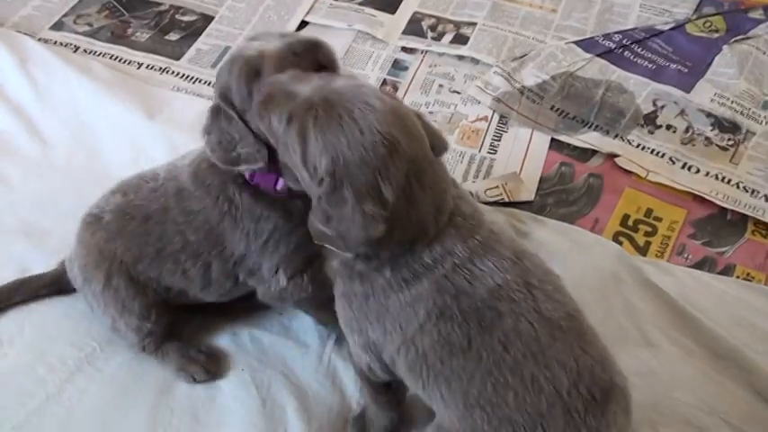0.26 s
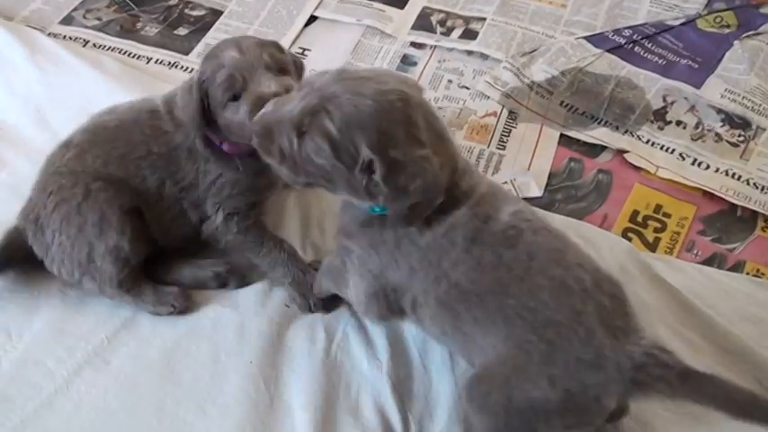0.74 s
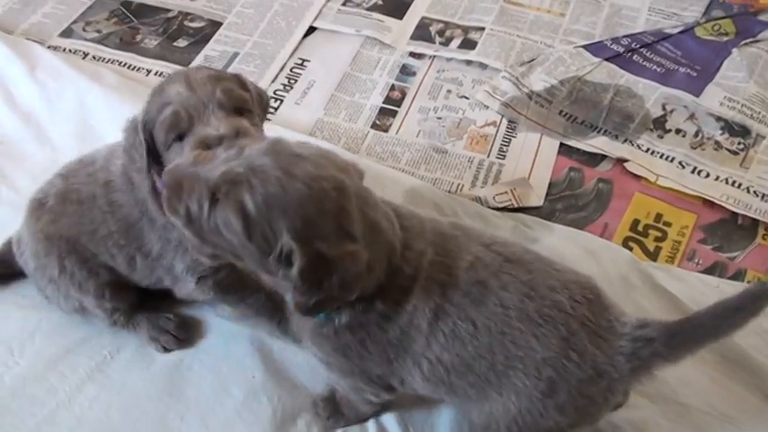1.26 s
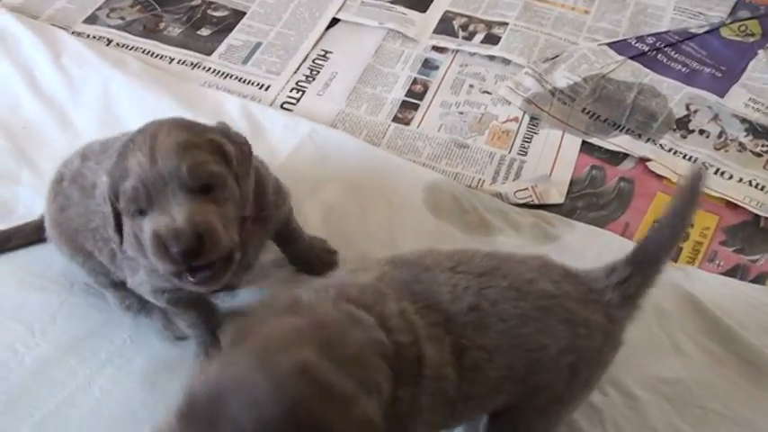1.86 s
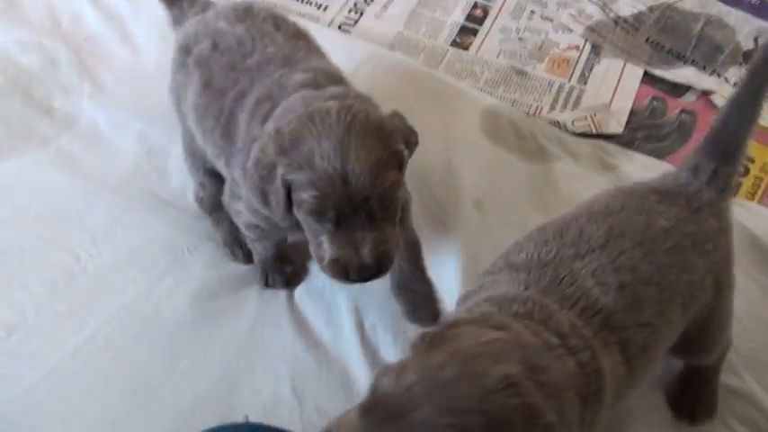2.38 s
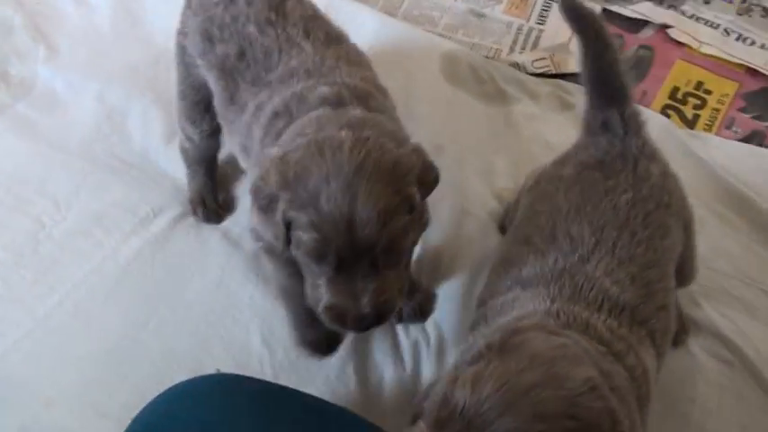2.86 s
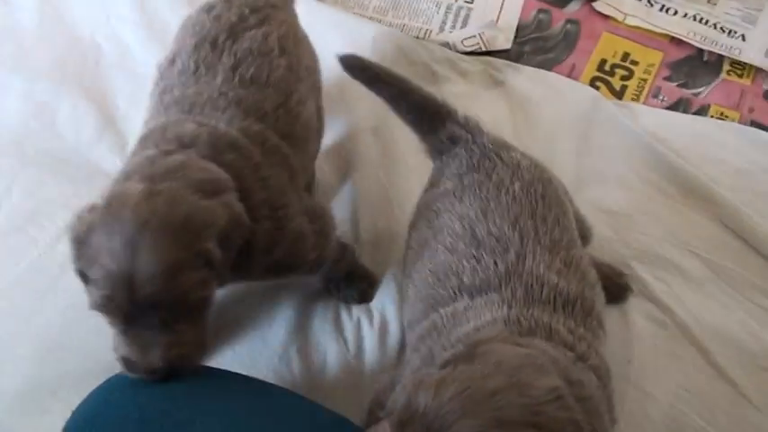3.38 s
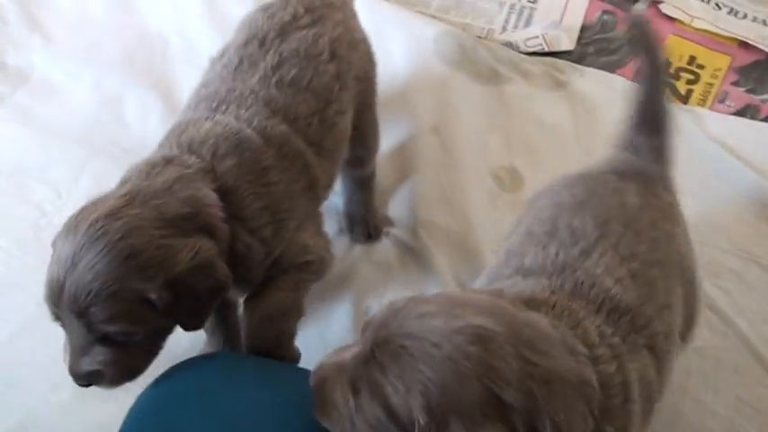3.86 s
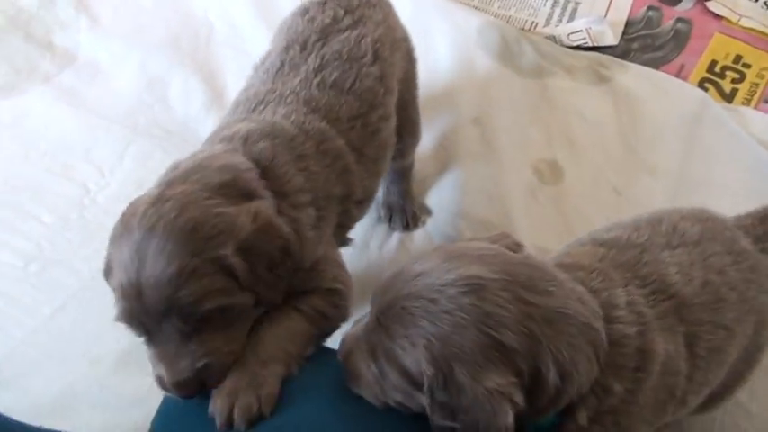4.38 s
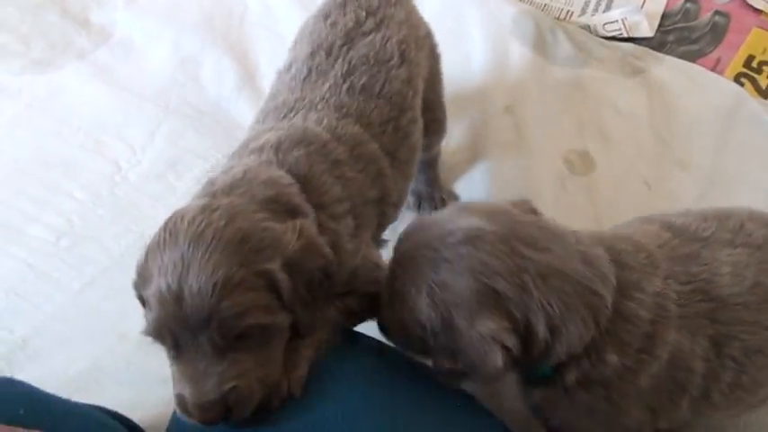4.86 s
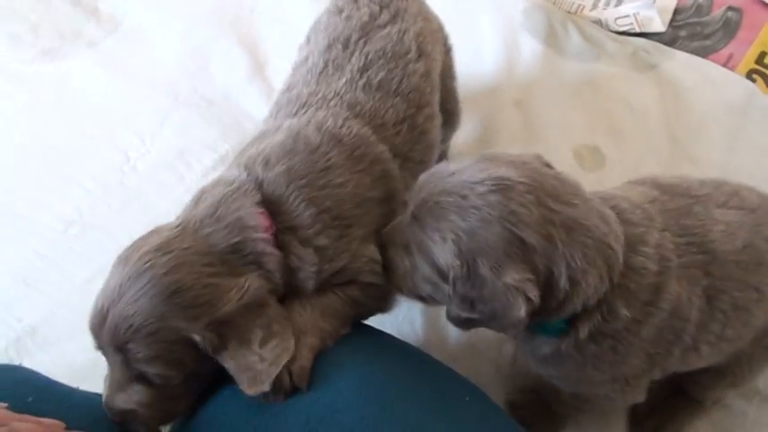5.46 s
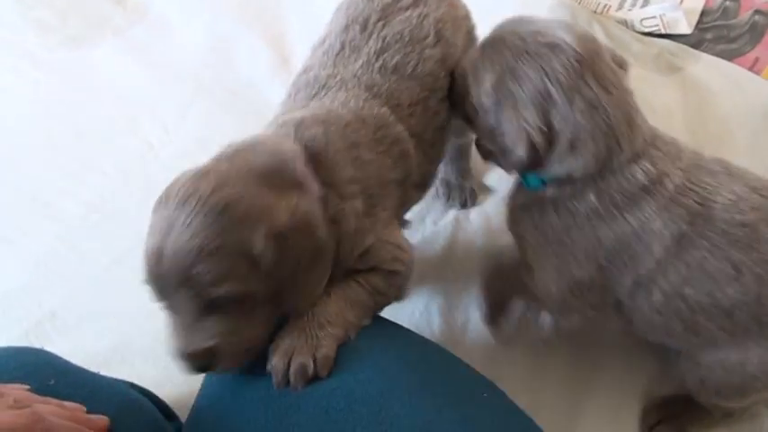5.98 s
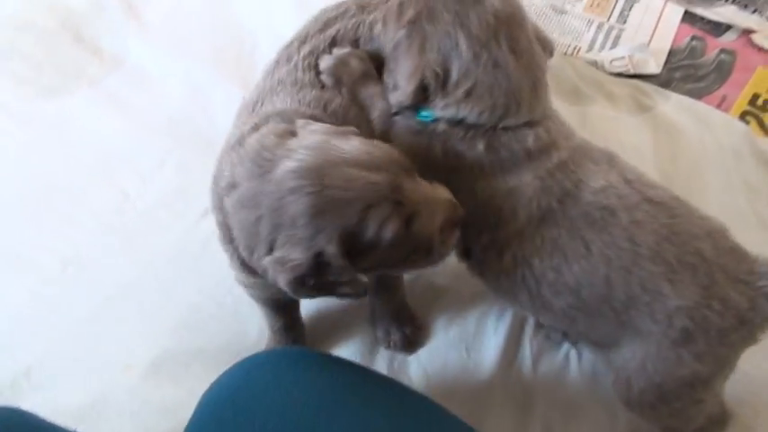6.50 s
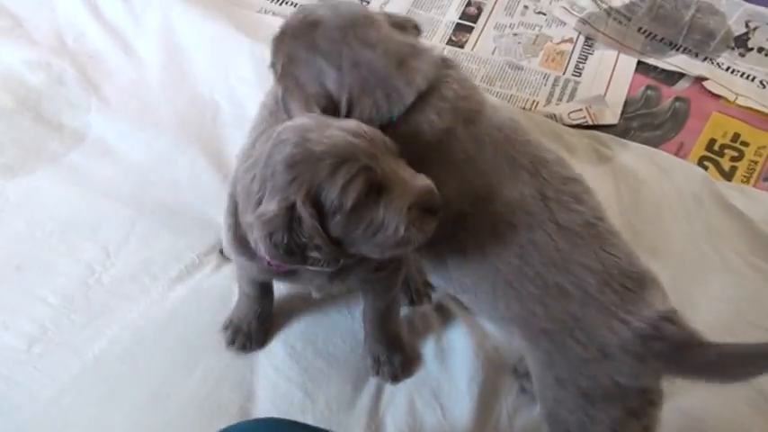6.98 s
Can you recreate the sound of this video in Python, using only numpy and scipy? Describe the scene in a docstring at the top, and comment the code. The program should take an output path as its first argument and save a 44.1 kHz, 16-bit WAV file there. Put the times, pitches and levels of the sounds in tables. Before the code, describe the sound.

A close, dry stereo scene in a small quiet room with a soft steady hush. From 0.1 to 0.6 seconds a small puppy growls, rough and rattling, rising then sinking in pitch, with buzzing throat and hissy breath. A very short growl follows at 0.6, amid loud fur rubbing, paw scuffs and sharp ticks. A second long raspy growl runs from 0.8 to 1.35, ending in a faint airy huff; a third, smoother toward its end, lasts from 1.6 to 2.2. Then things quieten: scuffs and claw ticks around 2.3 to 2.6, a tiny low grunt at 2.8, rustling cloth and scratchy zips at 2.4, 3.1 and, rising, 3.9. Sparse clicks and faint crackles continue, with a very faint grunt at 5.2 and dull soft bumps near 5.7, 6.05 and 6.8. Brighter rubbing, ticks and a scuff return around 7.0 to 7.2.

```python
"""One of two wrestling puppies gives three long rattling growls and a short one, a huff and two soft grunts:
uneven vocal-fold pulses and air puffs ring mouth and muzzle; grunts are harmonic sums, the huff is pure noise.
Fur and paws rub and scuff cloth (grain noise), claws tick (snaps) and zip over the weave (gliding noise bands),
mouths and creases crackle (decaying sines) and bodies bump on bedding (wide low resonances).
A small quiet room adds echoes, a short tail and a steady hush."""
import sys
import numpy as np
from scipy import signal
from scipy.io import wavfile
from scipy.ndimage import uniform_filter1d

SR = 44100
rng = np.random.default_rng(int(sys.argv[2]) if len(sys.argv) > 2 else 0)


def generate_wav(signal):
    """Clip the signal to [-1, 1] and save it as 16-bit WAV at the path in sys.argv[1]."""
    frames = np.transpose(np.atleast_2d(signal))
    scaled = np.clip(frames, -1, 1) * 32767
    pcm = np.round(scaled).astype(np.int16)
    wavfile.write(sys.argv[1], SR, pcm)


N = 319284
TIME_S = np.arange(N) / SR
BINS_HZ = np.fft.rfftfreq(4096, 1 / SR)

# Growl courses, one list per growl: t/s, effort/dB, pitch/Hz, roughness/1, mouth resonance/Hz
GROWL_COURSES = [
    [(0.075, -59, 149.9, .4, 1510), (0.1, -42, 160, .5, 1520), (0.17, -35, 190.8, .78, 1640),
     (0.25, -40, 184.3, 0.65, 1600), (0.33, -35, 213.2, .8, 1645), (0.41, -34.5, 225.6, 0.81, 1500),
     (0.48, -37.5, 207.8, 0.39, 1530), (0.57, -48, 173, 0.45, 1680)],
    [(0.56, -46, 174.9, .55, 1780), (0.622, -28.5, 220, .6, 2100), (0.66, -63, 210, 1.1, 2000)],
    [(0.825, -47, 184.7, .7, 1500), (0.872, -31.5, 222, 0.76, 1410), (0.99, -34, 200.2, 0.76, 1620),
     (1.05, -39.5, 199.6, 0.59, 1540), (1.11, -35.5, 213.5, 0.17, 1500), (1.16, -35.5, 205.5, 0.76, 1570),
     (1.215, -38.5, 209.2, 0.5, 1400), (1.25, -33.5, 229.8, 0.57, 1070), (1.335, -39.5, 214, 0.46, 1382),
     (1.37, -59, 205, 0.7, 1424)],
    [(1.612, -46.5, 195.5, 0.7, 1500), (1.67, -34.5, 195, .76, 1500), (1.73, -37, 189.1, .7, 1610),
     (1.81, -33.5, 216.1, .68, 1610), (1.9, -34, 208.5, 0.21, 1580), (1.97, -34, 210, 0.29, 1396),
     (2.1, -34, 208.1, 0.19, 1330), (2.19, -44, 155, 0.12, 1410), (2.25, -60, 123.6, 0, 1643)],
]
# Growl voicings, one row per growl: rattle depth/1, throat buzz/dB, rasp/dB, whistle start/dB, whistle end/dB,
# whistle start f/Hz, whistle end f/Hz; levels re effort, before the shifts below
GROWL_VOICINGS = [(.45, -7, -1.5, -23, -10.5, 9880, 9180), (.5, -11, -6.5, -27, -32, 9300, 8900),
                  (.5, -8.5, -2, -15, -32, 10900, 8100), (.65, -5, -2, -27, -17, 8600, 10100)]
# Voice colours, relative spectra: f/Hz, level/dB
CHEST_SPECTRUM = [(50, -37), (70, -19.5), (105, -17), (145, -7.5), (210, 2.5), (305, 6), (370, -7),
                  (500, -12), (900, -58), (4000, -88)]
BUZZ_SPECTRUM = [(200, -36), (330, 3.5), (430, -2.5), (570, 3), (740, -2.5), (860, -10.5), (1100, -1.5),
                 (2000, -33), (8000, -82)]
RASP_SPECTRUM = [(400, -39), (850, -9), (1100, 2), (1500, -3), (2050, 2), (2400, -5), (2800, -19),
                 (5000, -39), (12000, -72)]
HISS_SPECTRUM = [(1500, -35), (2600, -0.5), (3400, -1.5), (5000, 1.5), (7000, -0.5), (9000, 1.5),
                 (11000, 0.5), (16000, -11.5)]
# Upper muzzle resonances, moved by jaw and lips: centre f/Hz, width of each of two stages/Hz, level/dB
MUZZLE_RESONANCES = [(3490, 1400, 6), (4340, 1240, -0.5), (5500, 1040, 5.5), (6290, 670, 0.5),
                     (8060, 580, -2)]
# Closed-mouth grunts, one list each: t/s, level/dB, pitch/Hz
GRUNTS = [
    [(2.777, -70, 172), (2.792, -41.5, 153.5), (2.812, -51, 126), (2.835, -53, 106.6), (2.88, -53, 98),
     (2.915, -66, 88)],
    [(5.175, -69, 183.6), (5.205, -48.5, 166.6), (5.24, -57, 157.5), (5.29, -60, 156)],
]
# Nose transmission of the grunts: f/Hz, level/dB
NOSE_SPECTRUM = [(60, -16), (100, -4), (150, -6), (230, 2), (310, -0.5), (420, -19), (600, -13), (900, -40),
                 (1250, -9), (2000, -40)]
# Voiceless huff from the end of the second long growl: t/s, level/dB
HUFF_COURSE = [(1.34, -62), (1.38, -49), (1.45, -54), (1.52, -59), (1.58, -74)]
# Fur and paws sliding on cloth: t/s, length/s, rub level/dB, muffled drag level/dB before DRAG_TRIM_DB
SLIDES = [(-0.03, 0.027, -51, -51.5), (0.479, 0.14, -40.5, -47.5), (0.568, 0.076, -38, -49),
          (0.684, 0.15, -42, -44.5), (1.377, 0.13, -55.5, -61.5), (2.189, 0.14, -49.5, -53.5),
          (2.515, 0.18, -50, -52), (2.756, 0.04, -54, -55.5), (2.946, 0.083, -51.5, -56.5),
          (3.129, 0.25, -51, -53), (3.446, 0.078, -59, -59.5), (3.566, 0.14, -55.5, -59),
          (3.847, 0.04, -57, -65), (3.943, 0.24, -57, -58), (4.93, 0.045, -54.5, -54.5),
          (5.2, 0.11, -59.5, -58), (5.392, 0.074, -56.5, -62), (5.532, 0.058, -64, -64),
          (5.692, 0.1, -65.5, -64.5), (5.904, 0.12, -58.5, -56), (6.38, 0.076, -57.5, -58),
          (6.542, 0.1, -55.5, -56.5), (6.752, 0.29, -62.5, -59), (6.948, 0.26, -51.5, -56),
          (7.108, 0.084, -45.5, -48)]
# Colours of rub and drag: f/Hz, level/dB
CLOTH_SPECTRUM = [(500, -13.5), (1200, 6), (1700, 3), (2400, 4), (4300, -3.5), (6200, -0.5), (7600, -6),
                  (10000, -10), (13000, -12.5), (16000, -28.5)]
DRAG_SPECTRUM = [(80, -36.5), (200, -6), (330, 3.5), (450, 0.5), (620, 3), (850, -2.5), (1150, 0),
                 (1500, -6.5), (2500, -19.5)]
# Paw strokes: t/s, length/s, level/dB before SCUFF_TRIM_DB, ring f/Hz, bass/dB, treble/dB
SCUFFS = [(0.146, 0.0059, -29, 2230, -8, -1), (0.502, 0.038, -36, 5060, 4, 3.5),
          (0.596, 0.048, -31.5, 3130, -10.5, -10), (1.299, 0.0097, -29, 435, 3, 0),
          (2.302, 0.021, -35, 5650, 1, -4.5), (2.367, 0.018, -39, 4040, -12, -8),
          (2.495, 0.011, -40.5, 614, 9.5, -5), (2.556, 0.028, -35.5, 1920, -1.5, -2.5),
          (2.965, 0.027, -45, 3580, 2, -5), (3.21, 0.025, -40.5, 2430, -4, -5.5),
          (3.326, 0.014, -35, 1140, 3, -4), (3.988, 0.046, -49, 1320, 0, -6.5),
          (4.548, 0.017, -47.5, 1100, 5.5, -9), (4.688, 0.012, -45, 1020, 3.5, 0.5),
          (4.892, 0.004, -48, 2770, 19, 16), (5.197, 0.034, -45, 570, 4.5, -9),
          (5.42, 0.042, -47.5, 1330, 2.5, -4), (5.956, 0.019, -35.5, 2290, -2.5, -1.5),
          (6.283, 0.011, -47.5, 6360, -7, 3), (6.445, 0.039, -48, 2400, 2, -4),
          (7.159, 0.028, -40.5, 1217, 2.5, 1)]
# Claw ticks, mouth smacks and sheet snaps: t/s, energy/dB, ring f/Hz, bass/dB, treble/dB
TICKS = [(0.485, -13.5, 1790, -4, -3), (0.5174, -9, 5540, 7, 3), (0.5384, -7, 2340, -21, 1),
         (0.616, -7, 2270, -16, -22), (0.6325, -2, 2710, -21, -20), (0.7093, -9, 5440, -2, 13),
         (0.7968, -14.5, 1630, 1, 2), (1.138, -21, 4860, -12, 6), (1.2983, -6.5, 1970, -4, -10),
         (1.4744, -20.5, 3720, -2, -3), (2.2396, -17.5, 6460, -27, -9), (2.306, -12.5, 6100, -9, 0),
         (2.3232, -8, 5460, -14, 11), (2.659, -15, 1480, 3, -2), (2.7021, -16, 1165, 3, 2),
         (2.7365, -12, 2300, -4, 7.5), (2.7839, -17.5, 1420, 6, -11), (3.036, -17.5, 3060, -1, -3),
         (3.355, -15.5, 1190, 1, -1), (3.3702, -18.5, 2300, -6, -4), (3.4352, -21.5, 6040, -6, 10),
         (3.4703, -16, 2050, -1.5, 0), (3.617, -17, 6470, -15, -2), (3.6969, -19.5, 3240, 6, -10),
         (4.1403, -18.5, 7200, -12, 8), (4.4874, -31, 2390, -12, -25), (4.6376, -26, 1270, 16, -19),
         (4.8927, -16, 2900, 3, 3.5), (4.93, -25.5, 5370, -4, -13), (4.989, -16, 2390, -3.5, -8),
         (5.1355, -26.5, 3280, -29, -27), (5.1892, -25.5, 2550, -8, -22), (5.4213, -17, 6370, 0, -4.5),
         (5.5104, -23, 1170, -2, -14), (5.57, -19.5, 2400, -16, -9), (5.6009, -20, 2450, -4.5, -1.5),
         (5.7215, -23.5, 1540, -1, -17), (5.9399, -27, 1440, 0, -6), (5.961, -14, 3500, -16, -15),
         (6.0436, -18, 6150, -1, -4), (6.1844, -24, 5950, -14, -8), (6.2876, -19, 6300, 5, -13),
         (6.3808, -17, 970, -5, 1.5), (6.4045, -20, 1060, -1, -4), (6.6094, -21.5, 4770, -1, -5),
         (6.724, -19, 2700, -4.5, -10), (6.7624, -18, 3660, -1.5, -1), (6.932, -15, 1150, -3, -11),
         (7.0062, -23, 6500, 9, 14), (7.0829, -10.5, 3020, -10.5, -6), (7.1607, -10, 1380, 6, -14),
         (7.212, -16.5, 3560, -4, 0)]
# Claw zips over the weave, one list each: t/s, level/dB, thread rate f/Hz
ZIPS = [
    [(2.37, -56, 2220), (2.379, -40, 2400), (2.388, -52, 2520), (2.396, -62, 2500)],
    [(3.12, -47, 2090), (3.137, -44.5, 2200), (3.155, -51, 2270), (3.175, -44, 2310)],
    [(3.85, -64, 1500), (3.868, -46, 2200), (3.878, -41, 2720), (3.885, -38, 3320), (3.897, -42, 3730),
     (3.91, -58, 3900)],
]
# Body bumps on the bedding: t/s at half height, length at half height/s, level/dB, f/Hz
BUMPS = [(4.352, 0.12, -65, 39.2), (4.356, .04, -62.5, 170), (4.64, 0.099, -65, 45),
         (4.66, 0.039, -66, 122), (4.928, 0.073, -63, 44.5), (5.683, 0.043, -52.5, 314),
         (5.685, 0.13, -55, 33.7), (5.769, 0.047, -61, 201), (6.039, 0.044, -49.5, 270),
         (6.061, 0.053, -57.5, 102), (6.817, 0.042, -50.5, 274)]
# Room decay: f/Hz, t60/s
ROOM_DECAY = [(150, 0.28), (500, 0.31), (2000, 0.29), (6000, 0.4), (14000, 0.15)]
# Floor and wall echoes: delay/s, gain re direct sound/1
ECHOES = [(.0031, -0.18), (.0068, 0.012), (0.0116, 0.21), (0.0142, 0.19)]
# Stereo balance: t/s, left minus right/dB
PAN_COURSE = [(0.0, 0.0), (2.08, 0.5), (2.5, -0.5), (3.3, -.1), (3.8, -1.6), (7.24, -0.5)]
# Still room air, relative spectrum: f/Hz, level/dB
AIR_SPECTRUM = [(15, -30), (25, -6), (64, 0.5), (141, -6.5), (476, -2.5), (677, -10), (1260, -5),
                (1940, -10), (2350, -9), (4370, -15), (6210, -15), (14800, -26.5), (16000, -25)]

# Growl levels re effort, at roughness 0.5; hiss also at its usual effort
CHEST_DB, HISS_DB = -1, -7
# Shift per unit roughness: power moves up out of the chest
CHEST_ROUGH_DB, RASP_ROUGH_DB, HISS_ROUGH_DB = -3.5, 12, 5.5
# Turbulence gains on the tone: extra dB per dB of effort
HISS_GROWTH, USUAL_EFFORT_DB = 0.17, -36.5
# Buzz gains as the mouth closes and its resonance sinks
BUZZ_DB_PER_OCTAVE, USUAL_MOUTH_HZ = -10, 1500
# Tooth whistle rises (exponent) and swells with pitch
WHISTLE_BEND, WHISTLE_DB_PER_OCTAVE, USUAL_PITCH_HZ = 0.073, 30, 210
# Loose tissue starts to rattle above this effort, fully after the range
RATTLE_FROM_DB, RATTLE_RANGE_DB = -49.5, 13
SLIDE_RISE_S, SLIDE_FALL_S = 0.021, 0.087
# Constant fur stirring, drag before its trim
FUR_DB, FUR_DRAG_DB = -74.5, -67.5
DRAG_TRIM_DB, SCUFF_TRIM_DB = 0.5, -0.5
AIR_DB = -62.5  # part common to both channels
EDGE_HZ = 16000


def amp(db):
    """Decibels to gain."""
    return 10 ** (np.asarray(db) / 20)


def unit(x):
    """Scales to rms 1."""
    return x / np.sqrt(np.mean(x ** 2) + 1e-20)


def steady(x, size=2200):
    """Holds short-term rms at 1 over size samples, so a level curve can take over."""
    return x / np.sqrt(abs(uniform_filter1d(x ** 2, size)) + 1e-12)


def read(points, hz=BINS_HZ):
    """Interpolates a spectrum table on a log-frequency axis."""
    f, value = np.transpose(points)
    return np.interp(np.log(hz + 1), np.log(f + 1), value)


def follow(rows, t):
    """Interpolates each column of a curve table at times t."""
    s, *columns = np.transpose(rows)
    return [np.interp(t, s, column) for column in columns]


def add(mix, start_s, sound):
    """Mixes a sound in at start_s."""
    part = mix[max(round(start_s * SR), 0):][:len(sound)]
    part += sound[:len(part)]


def impulse(db):
    """Minimum-phase impulse response of a spectrum, energy 1."""
    log_gain = np.log(amp(np.maximum(db, -100)))
    both_sides = np.r_[log_gain, log_gain[-2:0:-1]]
    response = np.fft.ifft(np.exp(np.conj(signal.hilbert(both_sides)))).real[:2048]
    return response / np.linalg.norm(response)


def colour(x, db):
    """Filters x by a spectrum."""
    return signal.fftconvolve(x, impulse(db))[:len(x)]


def resonate(x, hz, width_hz):
    """Resonance of peak gain 1 following hz: shift to zero, one-pole low-pass, shift back."""
    turn = np.exp(2j * np.pi * np.cumsum(hz * np.ones(len(x))) / SR)
    pole = np.exp(-np.pi * width_hz / SR)
    return 2 * (turn * signal.lfilter([1 - pole], [1, -pole], x / turn + 1e-18)).real


def ring(x, hz, width_hz):
    """Two resonances in series: steep flanks, dark valleys."""
    return resonate(resonate(x, hz, width_hz), hz, width_hz)


def wander(count, size):
    """Smoothed noise of rms 1."""
    noise = rng.standard_normal(count)
    return unit(uniform_filter1d(uniform_filter1d(noise, size), size))


def random_clicks(count, per_s, spread_db, limit):
    """Sparse clicks of unequal size, as a gain per sample."""
    size = amp(spread_db * np.minimum(rng.exponential(1, count), limit))
    return size * (rng.random(count) < per_s / SR)


def grains(count, per_s, spread_db, smooth):
    """Fibres catching and letting go: clicks over a smooth hiss."""
    clicks = random_clicks(count, per_s, spread_db, limit=4) * rng.standard_normal(count)
    return unit(unit(clicks) + smooth * rng.standard_normal(count))


def larynx(t, hz, rough, rattle, jitter=0.17, shimmer=0.51, slip=0.6, snap=0.5,
           puff_cycles=0.82, leak=0.12, chest_share=0.6):
    """Uneven fold pulses; slower tissue weakens about two in three, which the chest feels less."""
    speed = np.maximum(1 + jitter * rough * wander(len(t), size=200), 0.3)
    turns = np.cumsum(hz * speed) / SR
    cycle = turns.astype(int)
    stray, push = np.clip(rng.standard_normal((cycle[-1] + 1, 2)), -2, 2)[cycle].T
    closure = np.diff(cycle, prepend=0)
    # Tissue turns a third per closure, erratically when rough
    slow_turns = np.cumsum(closure * (1 + slip * rough ** 2 * stray)) / 3 + 1 / 6
    weak = slow_turns % 1 > 1 / 3
    size = (1 - np.clip(rattle, 0, 0.95) * weak) * np.exp(shimmer * rough * push)
    noise = rng.standard_normal(len(t))
    puffs = (leak + size ** snap * np.exp(-(turns % 1) / puff_cycles)) * noise
    return unit(closure * size), unit(closure * size ** chest_share), unit(puffs), noise


def growl(rows, voicing, hiss_air=0.048, mouth_width_hz=600, mouth_gain=1.64, stretch=0.043, lips=0.049,
          whistle_width_hz=900, teeth_db=-17):
    """Chest hums while pulses and air puffs ring mouth and muzzle; one effort drives them all."""
    t = np.arange(rows[0][0], rows[-1][0], 1 / SR)
    effort_db, pitch_hz, rough, mouth_hz = follow(rows, t)
    rattle, buzz_db, rasp_db, first_db, last_db, first_hz, last_hz = voicing
    # The lips slowly change the whistling gap
    whistle_db = np.linspace(first_db, last_db, len(t))
    whistle_hz = np.linspace(first_hz, last_hz, len(t))
    rattle_now = rattle * np.clip((effort_db - RATTLE_FROM_DB) / RATTLE_RANGE_DB, 0, 1)
    pulses, even_pulses, puffs, noise = larynx(t, pitch_hz, rough, rattle_now)

    chest = colour(even_pulses + rough * puffs, read(CHEST_SPECTRUM))
    buzz = colour(pulses + rough * puffs, read(BUZZ_SPECTRUM))
    rasp = colour(pulses + np.sqrt(abs(rough)) * puffs, read(RASP_SPECTRUM))
    rasp = rasp + mouth_gain * ring(rasp, mouth_hz, mouth_width_hz)

    jet = puffs + hiss_air * noise  # air never quite stops between pulses
    # Jaw and lips move the upper resonances
    shape = (mouth_hz / np.mean(mouth_hz)) ** stretch * (1 + lips * wander(len(t), size=3500))
    # The jet breaks up again at the teeth, in the same rhythm
    eddies = jet * rng.choice([-1., 1.], len(t))
    muzzle = sum(amp(db) * ring(jet, hz * shape, width_hz) for hz, width_hz, db in MUZZLE_RESONANCES)
    hiss = colour(muzzle + amp(teeth_db) * eddies, read(HISS_SPECTRUM))

    strain, harsh = pitch_hz / USUAL_PITCH_HZ, rough - 0.5
    whistle = ring(eddies, whistle_hz * strain ** WHISTLE_BEND, whistle_width_hz)
    hiss_growth_db = HISS_GROWTH * (effort_db - USUAL_EFFORT_DB)
    parts = [(CHEST_DB + CHEST_ROUGH_DB * harsh, chest),
             (buzz_db + BUZZ_DB_PER_OCTAVE * np.log2(mouth_hz / USUAL_MOUTH_HZ), buzz),
             (rasp_db + RASP_ROUGH_DB * harsh, rasp),
             (HISS_DB + HISS_ROUGH_DB * harsh + hiss_growth_db, hiss),
             (whistle_db + WHISTLE_DB_PER_OCTAVE * np.log2(strain), whistle)]
    voice = sum(amp(effort_db + db) * steady(part) for db, part in parts)
    return t[0], voice * signal.windows.tukey(len(t), 0.04)


def grunt(rows, jitter=0.014, shimmer_db=2.0):
    """A soft, sinking tone of 13 harmonics, coloured by the nose."""
    t = np.arange(rows[0][0], rows[-1][0], 1 / SR)
    db, hz = follow(rows, t)
    turns = np.cumsum(hz * (1 + jitter * wander(len(t), size=200))) / SR
    tone = sum(amp(read(NOSE_SPECTRUM, k * hz)) * np.sin(2 * np.pi * (k * turns + rng.random()))
               for k in range(1, 14))
    level = amp(db + shimmer_db * wander(len(t), size=200))
    return t[0], level * steady(tone) * signal.windows.tukey(len(t), 0.05)


def huff(mouth_hz=1750, width_hz=900, nose_hz=3600, nose_share=0.51):
    """Air noise through the half-open mouth, folds at rest: two resonances."""
    t = np.arange(HUFF_COURSE[0][0], HUFF_COURSE[-1][0], 1 / SR)
    db, = follow(HUFF_COURSE, t)
    noise = rng.standard_normal(len(t))
    breath = ring(noise, mouth_hz, width_hz) + nose_share * ring(noise, nose_hz, width_hz)
    return t[0], amp(db) * unit(breath)


def sliding():
    """Rub and drag strength: slides build, hold and die away over a constant stirring of fur."""
    power = amp([[FUR_DB], [FUR_DRAG_DB]]) ** 2 * np.ones(N)
    for start_s, length_s, rub_db, drag_db in SLIDES:
        rise = np.clip((TIME_S - start_s) / SLIDE_RISE_S, 0, 1)
        fall = np.exp(-np.clip((TIME_S - start_s - length_s) / SLIDE_FALL_S, 0, 20))
        power += (amp([[rub_db], [drag_db]]) * rise * fall) ** 2
    return np.sqrt(power)


def rub(rubbing, dragging, flutter_db=3.0):
    """Sliding fur and cloth: fine grains under uneven pressure."""
    fibres = grains(N, per_s=1800, spread_db=4.0, smooth=0.95) * amp(flutter_db * wander(N, size=400))
    bright = rubbing * unit(colour(fibres, read(CLOTH_SPECTRUM)))
    muffled = dragging * unit(colour(fibres, read(DRAG_SPECTRUM)))
    return bright + amp(DRAG_TRIM_DB) * muffled


def contact(ring_hz, bass_db, treble_db, ring_db, octaves):
    """Spectrum of a touch on the bedding: broad, with one ring."""
    base = [(60, bass_db - 14.5), (200, bass_db - 0.5), (400, bass_db + 6), (1000, bass_db + 3.5),
            (1900, 1), (4000, -0.74), (6200, treble_db), (10000, treble_db - 4.5), (15500, treble_db - 16)]
    distance = np.log2((BINS_HZ + 1) / ring_hz) / octaves
    return read(base) + ring_db * np.exp(-distance ** 2)


def scuff(start_s, length_s, db, ring_hz, bass_db, treble_db, rise_s=0.0026, fall_s=0.012, tail_s=0.1):
    """A short hard stroke: dense grains that die away as the paw lifts."""
    t = np.arange(int((length_s + tail_s) * SR)) / SR
    stroke = np.minimum(t / rise_s, 1) * np.exp(-np.maximum(t - length_s, 0) / fall_s)
    fibres = grains(len(t), per_s=2500, spread_db=0.0, smooth=0.39)
    sound = colour(fibres, contact(ring_hz, bass_db, treble_db, ring_db=6.5, octaves=0.14))
    return start_s, amp(db + SCUFF_TRIM_DB) * stroke * steady(sound, size=700)


def tick(start_s, db, ring_hz, bass_db, treble_db, crumble=0.42, crumble_s=0.00035):
    """One snap, with about a millisecond of crumbling noise after it."""
    t = np.arange(1500) / SR
    snap = (t == 0) + crumble * np.exp(-t / crumble_s) * rng.standard_normal(len(t))
    sound = colour(snap, contact(ring_hz, bass_db, treble_db, ring_db=8.5, octaves=0.27))
    return start_s, amp(db) * sound / np.linalg.norm(sound)


def claw_zip(rows, spread=0.3, overtone=0.15, scrape=0.46):
    """Threads plucked in quick succession: a fuzzy note at the thread rate, which follows claw speed."""
    t = np.arange(rows[0][0], rows[-1][0], 1 / SR)
    db, hz = follow(rows, t)
    noise, fibres = rng.standard_normal((2, len(t)))
    width_hz = spread * np.mean(hz)
    note = unit(ring(noise, hz, width_hz)) + overtone * unit(ring(noise, 2 * hz, 2 * width_hz))
    scraping = scrape * colour(fibres, read(CLOTH_SPECTRUM))
    return t[0], amp(db) * steady(note + scraping, size=400)


def crackle(rubbing, per_s=70, spread_db=5.0, level_db=-28, share=0.57, cycles=1.0, count=20):
    """Wet mouth clicks and creases letting go: decaying sines at 20 pitches, louder with the rubbing."""
    t = np.arange(600) / SR
    sound = np.zeros(N)
    for hz in np.geomspace(900, 7000, count):
        clicks = random_clicks(N, per_s / count, spread_db, limit=3)
        pop = np.sin(2 * np.pi * hz * t) * np.exp(-hz * t / cycles)
        sound += signal.oaconvolve(clicks, pop)[:N]
    return amp(level_db) * rubbing ** share * unit(sound)


def bump(half_s, length_s, db, hz):
    """A dull push: noise in a resonance too wide to ring."""
    noise = rng.standard_normal(int(2 * length_s * SR))
    push = unit(ring(noise, hz, hz))
    return half_s - length_s / 2, amp(db) * push * signal.windows.hann(len(push))


def room(x, wet_db=-10, side_db=-15, onset_s=0.0023):
    """Near echoes and a short tail; two close microphones hear nearly the same."""
    t = np.arange(SR // 2) / SR
    signs = rng.choice([-1., 1.], (2, len(t)))
    taps = signs * (rng.random((2, len(t))) < 3000 / SR) * np.minimum(t / onset_s, 1)
    hz, when_s, bands = signal.stft(taps, SR, nperseg=256)
    decay = amp(-60 * when_s / read(ROOM_DECAY, hz)[:, None])
    tails = signal.istft(bands * decay, SR, nperseg=256)[1]
    mid, side = tails / np.linalg.norm(tails, axis=1, keepdims=True) * amp([[wet_db], [side_db]])
    mid[0] += 1  # direct sound
    for delay_s, gain in ECHOES:
        mid[round(delay_s * SR)] += gain
    responses = np.array([mid + side, mid - side]) / np.linalg.norm(mid)
    return signal.fftconvolve(x[None], responses, axes=1)[:, :N]


def still_air(apart_share=0.64, mono_below_hz=150):
    """The room's own hush: coloured noise whose long waves reach both microphones alike."""
    common, apart = (unit(colour(rng.standard_normal(N), read(AIR_SPECTRUM))) for _ in range(2))
    high_pass = signal.butter(1, mono_below_hz, "high", fs=SR, output="sos")
    apart = signal.sosfilt(high_pass, apart)
    return amp(AIR_DB) * (common + apart_share * np.array([apart, -apart]))


def scene():
    """Voices, paws and cloth in the room, over still air."""
    rubbing, dragging = sliding()
    dry = rub(rubbing, dragging) + crackle(rubbing)
    sounds = [growl(rows, voicing) for rows, voicing in zip(GROWL_COURSES, GROWL_VOICINGS)]
    sounds += [grunt(rows) for rows in GRUNTS]
    sounds += [huff()]
    sounds += [claw_zip(rows) for rows in ZIPS]
    sounds += [scuff(*row) for row in SCUFFS]
    sounds += [tick(*row) for row in TICKS]
    sounds += [bump(*row) for row in BUMPS]
    for start_s, sound in sounds:
        add(dry, start_s, sound)
    pan_db, = follow(PAN_COURSE, TIME_S)
    return room(dry) * amp(np.array([pan_db, -pan_db]) / 2) + still_air()


def record(dry):
    """Limits the band to EDGE_HZ with a linear-phase low-pass."""
    low_pass = signal.firwin(511, EDGE_HZ, window=("kaiser", 9), fs=SR)
    return signal.oaconvolve(dry, low_pass[None], "same")


dry = scene()
out = record(dry)
generate_wav(out)
```